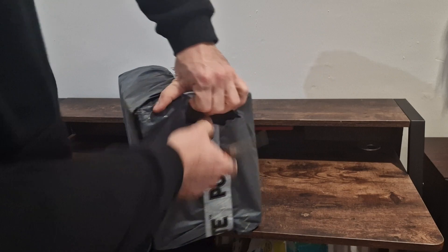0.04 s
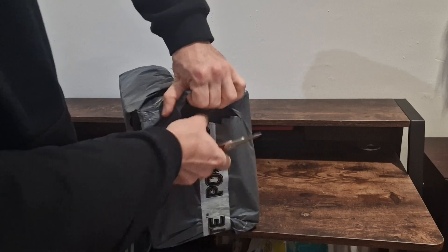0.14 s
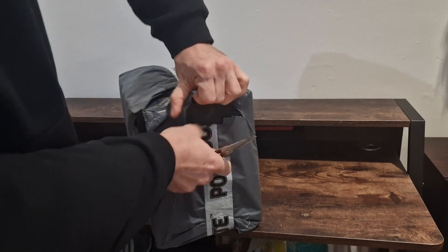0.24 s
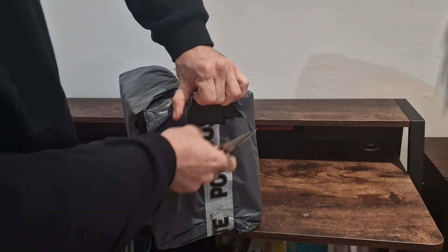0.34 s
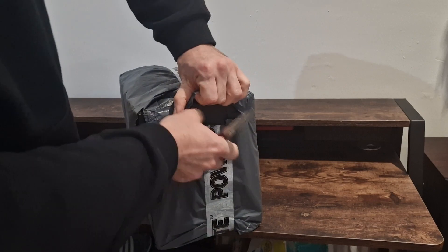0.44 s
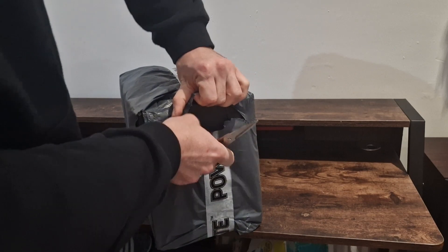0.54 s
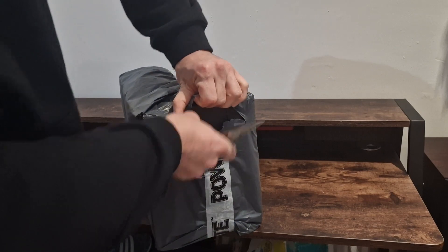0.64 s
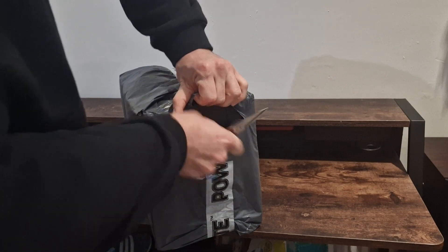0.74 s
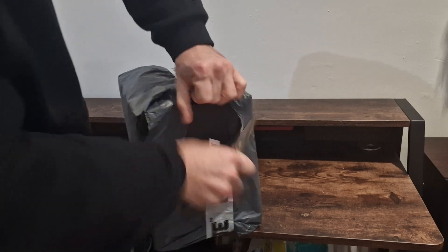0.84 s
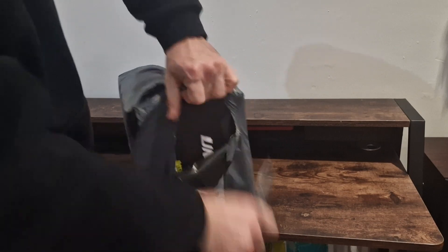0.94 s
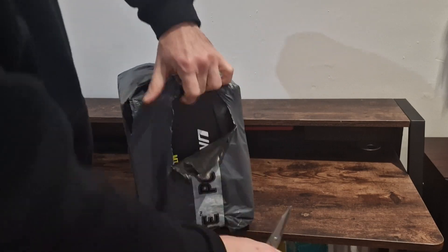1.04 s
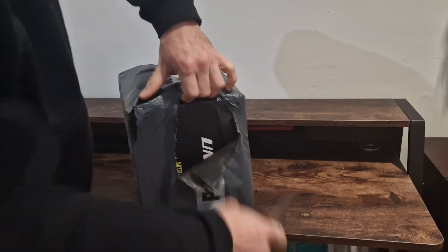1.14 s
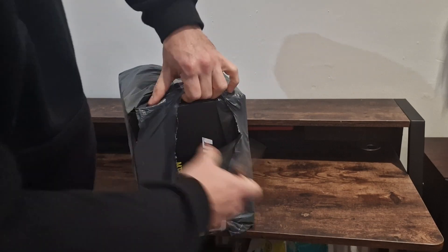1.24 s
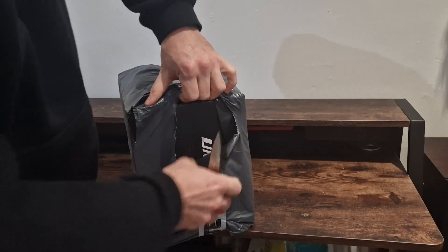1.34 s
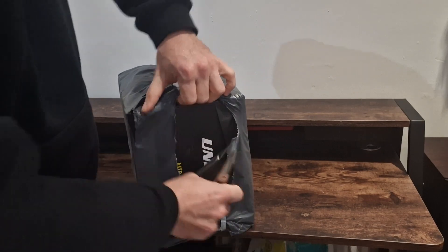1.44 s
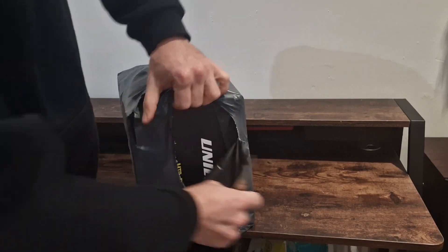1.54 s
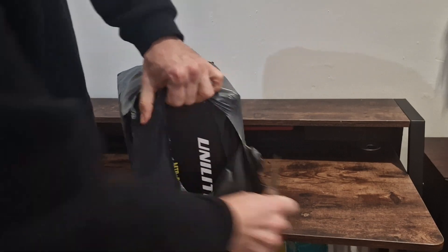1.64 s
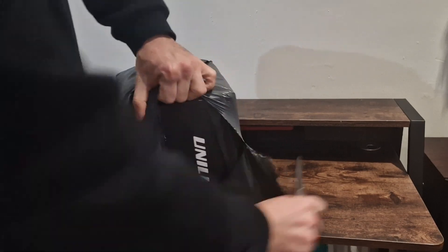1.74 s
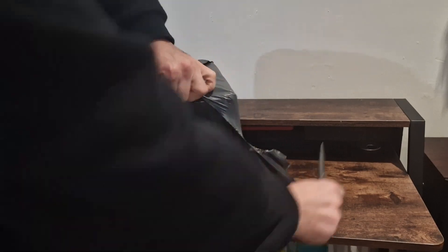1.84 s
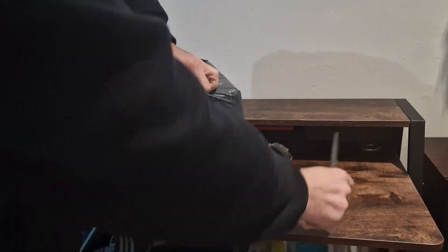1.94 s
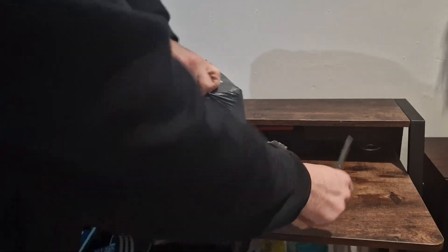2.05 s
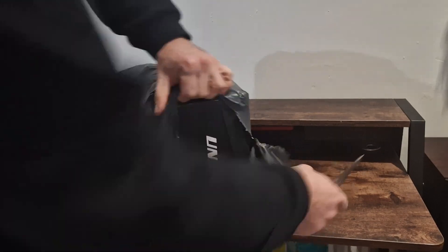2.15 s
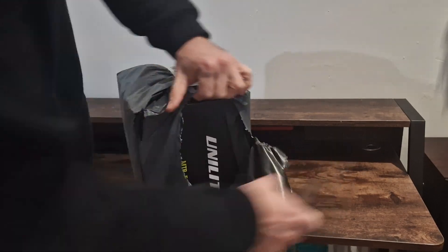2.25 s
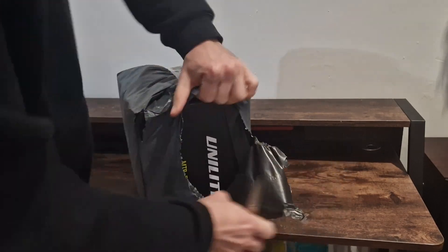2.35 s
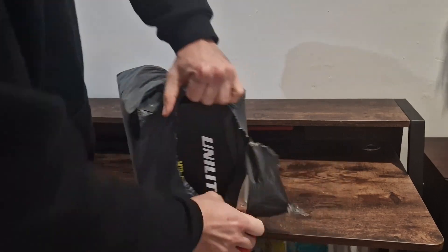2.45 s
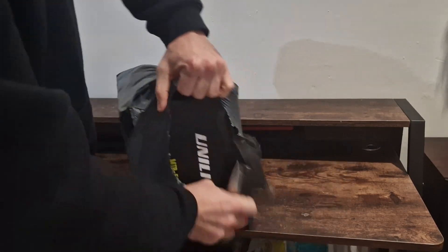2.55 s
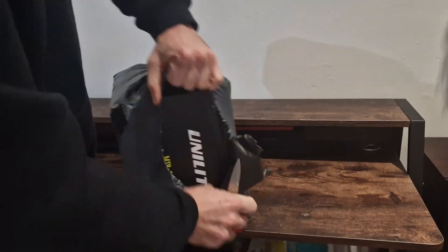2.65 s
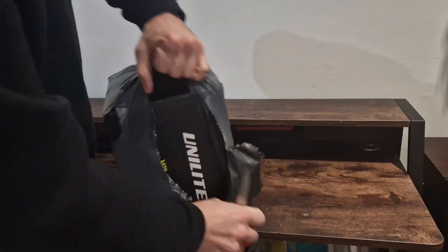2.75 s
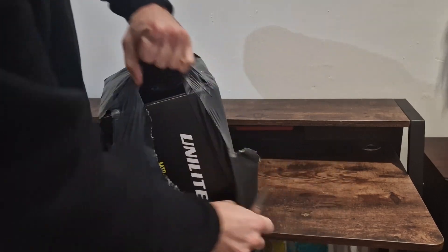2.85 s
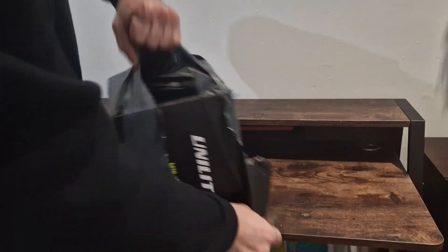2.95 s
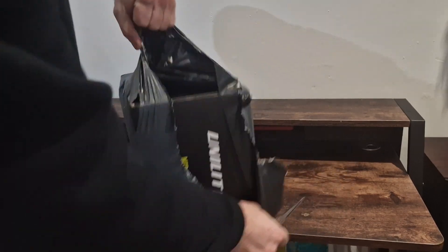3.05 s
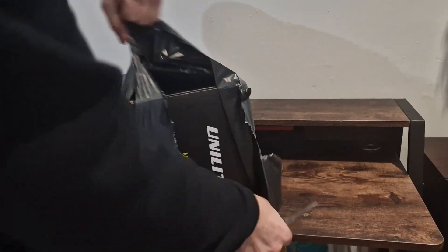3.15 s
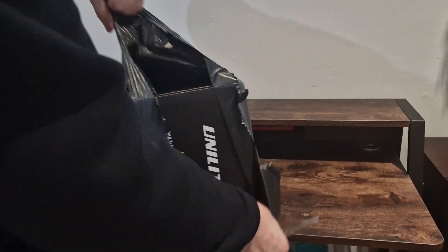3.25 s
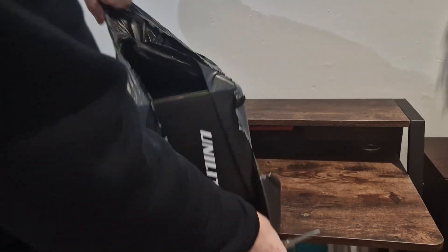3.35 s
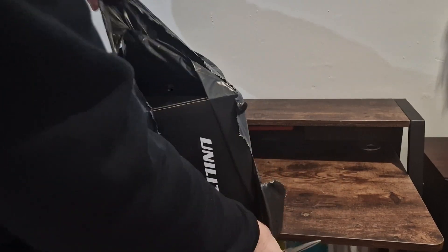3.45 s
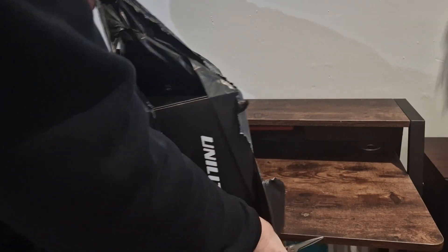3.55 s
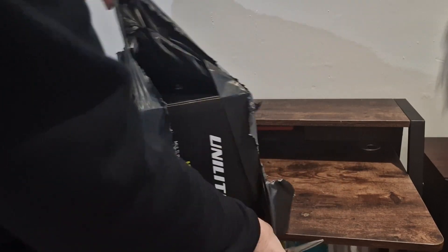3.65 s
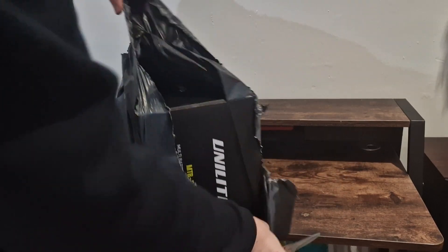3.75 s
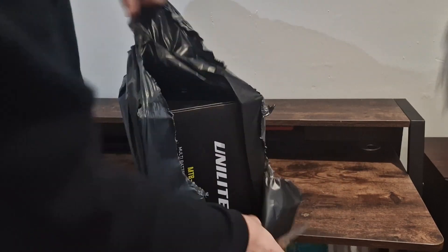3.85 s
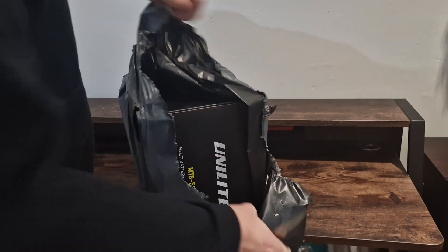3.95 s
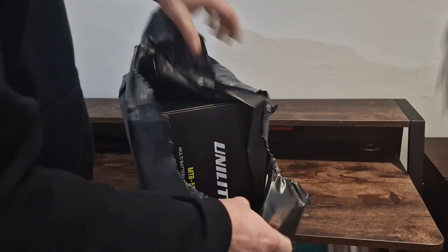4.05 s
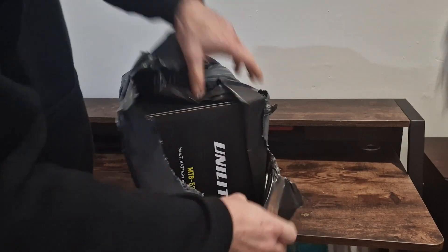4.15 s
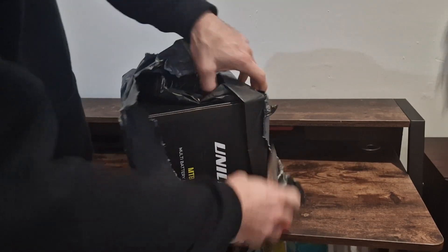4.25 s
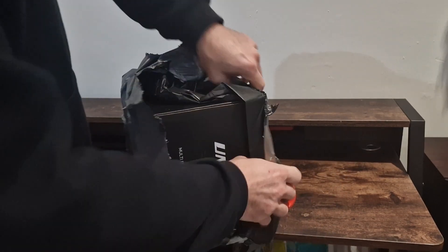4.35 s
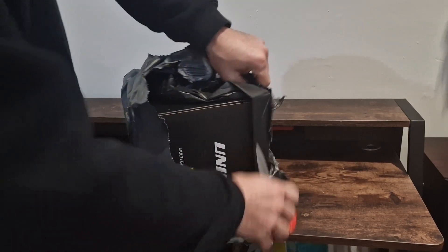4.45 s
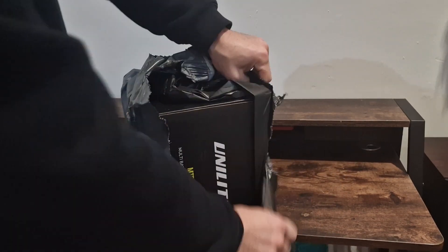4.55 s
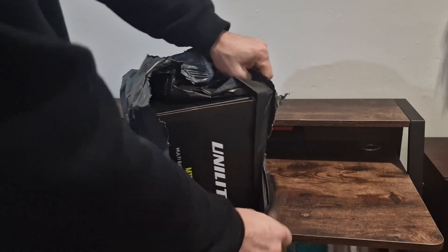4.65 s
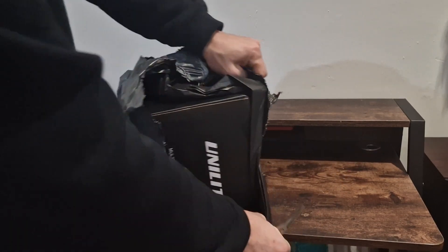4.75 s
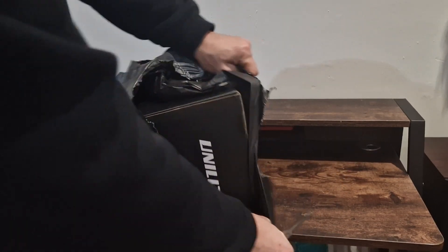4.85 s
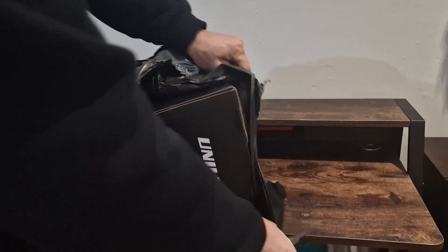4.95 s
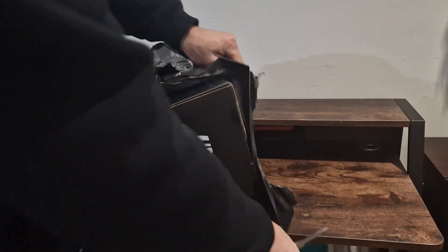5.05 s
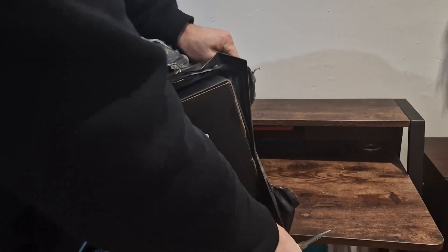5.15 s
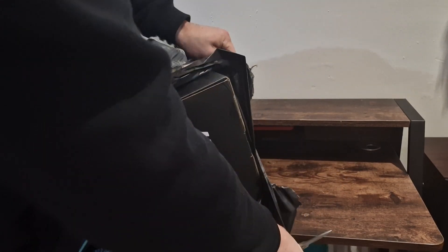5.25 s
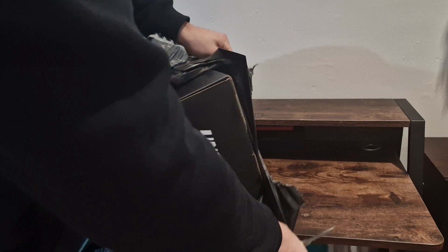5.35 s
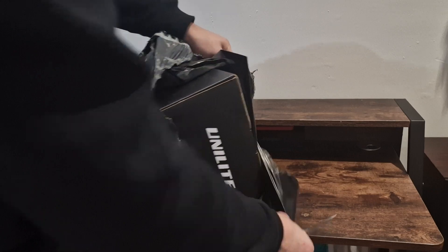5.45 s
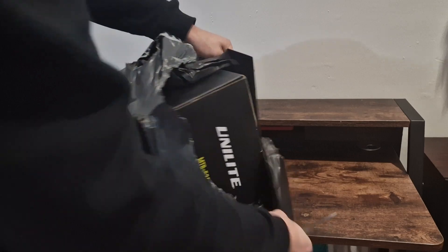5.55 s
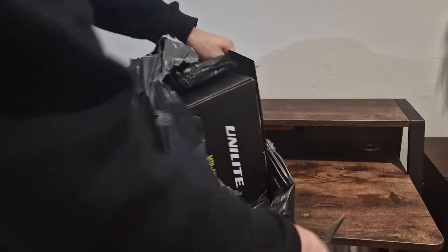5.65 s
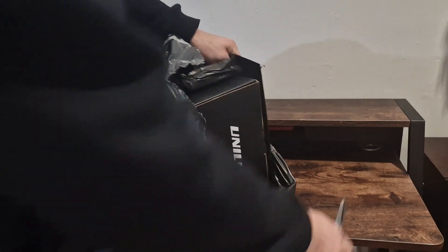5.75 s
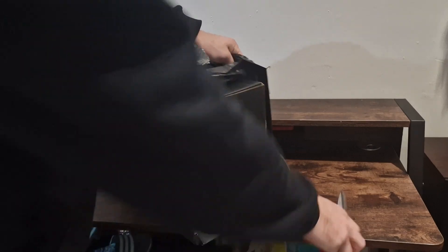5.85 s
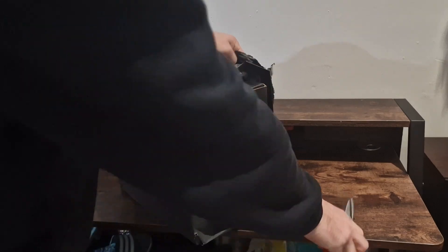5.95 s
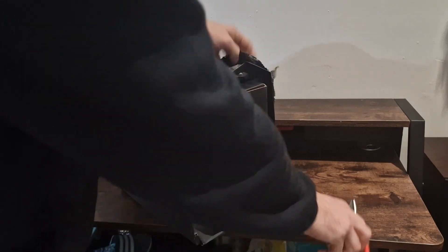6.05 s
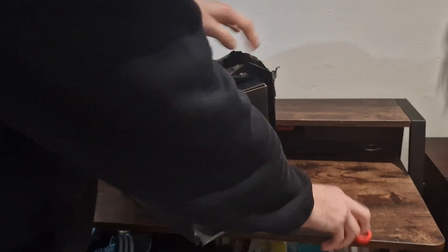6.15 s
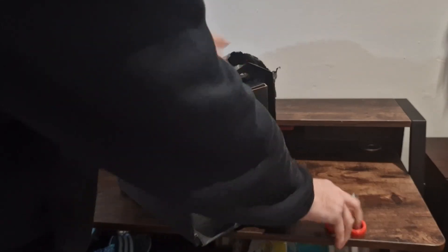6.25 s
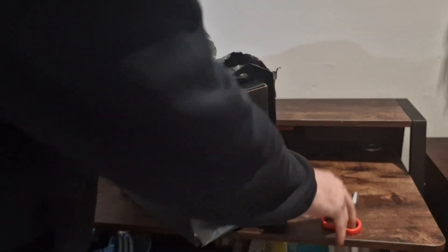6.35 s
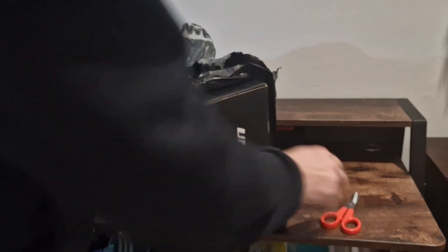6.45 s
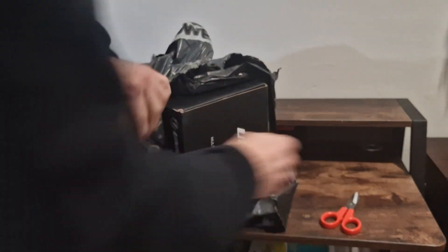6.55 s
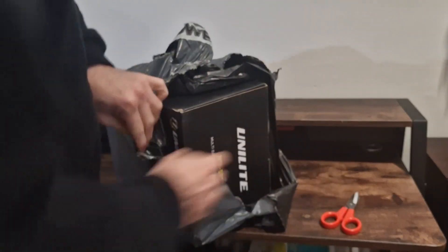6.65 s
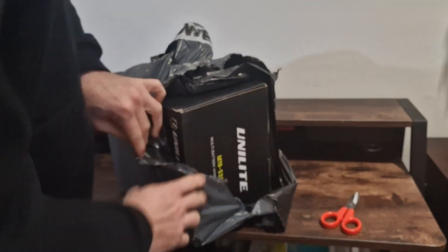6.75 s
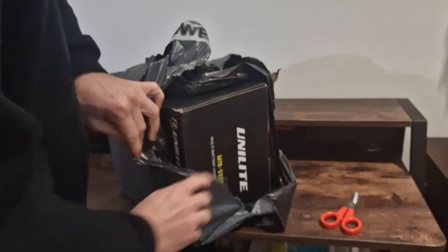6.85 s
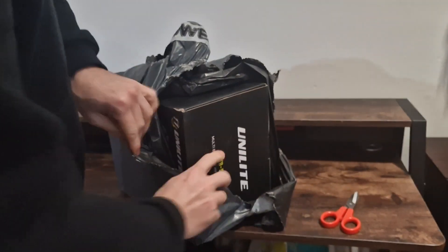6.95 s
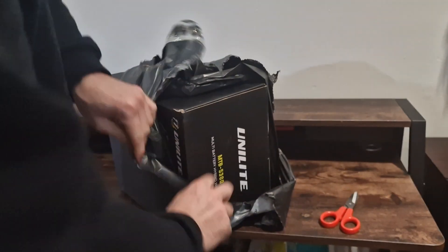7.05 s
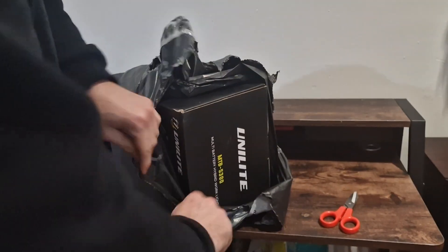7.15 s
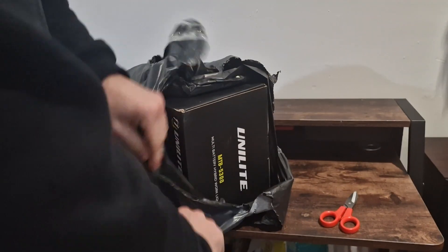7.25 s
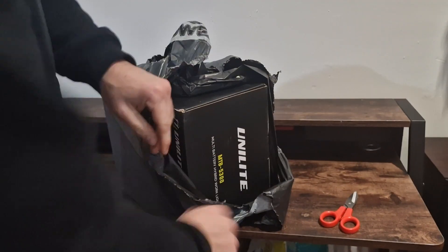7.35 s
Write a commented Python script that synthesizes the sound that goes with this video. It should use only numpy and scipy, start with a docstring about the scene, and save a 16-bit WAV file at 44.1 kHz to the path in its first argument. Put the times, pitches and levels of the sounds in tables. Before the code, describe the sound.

Hands rip a plastic bag away from a cardboard box on a desk indoors. Uneven crackling comes in grips and pauses, punctuated by dry loud snaps and hollow bumps. Sustained rustling follows, one more hard snap, then a pair of scissors lands on the wood with a bright knock and quick rattle. Light, crisp plastic rustle ends it. Near stereo microphones, short room reflections, faint hiss.

```python
"""Plastic film crackles and snaps as hands tear a mailer bag and drag it off a cardboard box on a desk.
The film is thousands of short damped clicks over a low boom; larger snaps are a click and a fizz.
Fingers and tugs knock the hollow box, made of pushes into resonances, and a finger squeaks faintly.
Scissors are tapped, then dropped rattling on the wooden desk, with ringing noise for their blades.
Two microphone ports a few centimetres apart hear it all in a small room with a quiet hush."""
import sys
import numpy as np
from scipy import signal
from scipy.fft import rfft, irfft, next_fast_len
from scipy.io import wavfile
from scipy.ndimage import map_coordinates

SR = 44100
rng = np.random.default_rng(int(sys.argv[2]) if len(sys.argv) > 2 else 0)


def natural_amplitude(level_db):
    """Convert a level in decibels to a linear amplitude factor, elementwise."""
    exponent = np.asarray(level_db, float) / 20
    return 10 ** exponent


def persist_wave(psi):
    """Save psi, clipped to +-1, as 16-bit WAV."""
    counts = np.round(np.clip(psi, -1, 1) * 32767).astype(np.int16)
    wavfile.write(sys.argv[1], SR, np.atleast_2d(counts).T)


N = 325899  # length in samples, about 7.4 s

# Resonances of the cardboard box. Each row: centre in Hz, width in Hz, strength in dB.
BOX_MODES = [(265, 74, 5), (363.4, 68, 2.5), (490, 88, -0.5), (750, 160, 0.5), (1050, 320, -2.5),
             (1383, 120, -3)]
# The deep thud: the air in the box and the desk under it. Each row: centre in Hz, width in Hz, strength in dB.
THUD_MODES = [(59, 37, -10.5), (92, 31, -0.5), (155.5, 26.3, 5)]
# Tone colour of the creasing film. Each row: frequency in Hz, relative gain in dB.
CREASE_COLOUR = [(180, 4), (300, -5.5), (406, 3), (529, -8), (755, -5), (861, -7), (1310, -2.5),
                 (1730, -0.5), (7000, -6), (9100, -2), (15400, -120)]
# Tone colour of the fine crackle. Each row: frequency in Hz, relative gain in dB.
CRACKLE_COLOUR = [(2060, 5), (3500, 9.5), (6280, 6), (6870, 6), (7480, 8), (11100, -1.5), (15200, 1.5),
                  (16200, -32), (16500, -49)]
# Where the hands work. Each row: time in seconds, samples by which the left port hears late,
# left over right level in dB.
HAND_PLACE = [(0, -3.5, 1.5), (1.2, -2.5, 2.5), (1.75, 0.5, 1.5), (2.25, -2.5, 1.7), (3.2, -3.5, 1),
              (4.2, -5, 1), (4.8, 3, 1), (5.7, 3, 0.5), (6.3, 2, 0.5), (6.7, -4, 1.3), (7.39, -4, -0.5)]


def unit(x):
    """Scale a sound to an rms of 1."""
    return x / np.sqrt(np.mean(x ** 2) + 1e-20)


def along(points, hz):
    """Read a (Hz, value) curve on a log frequency axis."""
    f, value = np.transpose(points)
    return np.interp(np.log(hz + 1), np.log(f + 1), value)


def wobble(rate):
    """A smooth random curve with the given number of knots a second."""
    knots = rng.standard_normal(int(N * rate / SR) + 4)
    return map_coordinates(knots, [np.arange(N) * rate / SR])


def filtered(x, response):
    """Filter a sound by a complex response of frequency."""
    m = next_fast_len(x.shape[-1] + 8192)  # spare room for the filter's tail
    return irfft(rfft(x, m) * response(np.fft.rfftfreq(m, 1 / SR)), m)[..., :x.shape[-1]]


def lag_at(s):
    """Samples by which the left port hears late a sound made at time s."""
    return np.interp(s, *np.transpose(HAND_PLACE)[:2])


def add(pair, s, x, scatter=0.):
    """Lay a sound into both ports, from a spot near the hands; scatter is in samples."""
    late = lag_at(s) + scatter * rng.standard_normal()
    starts = (round(s * SR + late), round(s * SR))
    for port, at in zip(pair, starts):
        port[at:at + len(x)] += x[:N - at]


def body(modes, sign=-1):
    """Response of a set of resonances; like signs leave dark valleys between them."""
    def response(f):
        total = 0
        for k, (centre, width, db) in enumerate(modes):
            damping = 1j * f * width
            total = total + sign ** k * natural_amplitude(db) * damping / (centre * centre - f * f + damping)
        return total
    return response


def ring(modes, contact_ms, scatter_db, judder=0., sign=-1):
    """One blow of peak 1: a half-sine push and juddering after-touches drive modes of varying strength."""
    t = np.arange(SR // 5) / SR
    push = np.sin(np.pi * np.clip(t * 1000 / contact_ms, 0, 1))
    touches = judder * rng.standard_normal(len(t)) * natural_amplitude(-60 * t / 0.067)
    touches[0] = 1
    force = signal.fftconvolve(push, touches)[:len(t)]
    struck = [(c, w, db + rng.normal(0, scatter_db)) for c, w, db in modes]
    x = filtered(force, body(struck, sign))
    return x / np.abs(x).max()


def judder_run(span, gap_s, peak_db, fall_db):
    """Uneven contacts that swell to a loudest moment and die away: rows of (seconds, dB)."""
    s = np.arange(span[0], span[2], gap_s)
    u = rng.random((len(s), 2)) - .5
    level_db = peak_db - fall_db * np.interp(s, span, [1, 0, 1])
    return zip(s + gap_s * u[:, 0], level_db + 4 * u[:, 1])


def pops(lo_hz, hi_hz, spectrum, clumps, cycles, spread_db, lag_spread, count):
    """Creases buckle all over the film: short damped clicks of unequal size, each from its own spot."""
    u = rng.random((count, 5))
    at = (u[:, 0] * (N - 200)).astype(int) + 20
    hz = lo_hz * (hi_hz / lo_hz) ** u[:, 1:2]
    size_db = np.minimum(-spread_db * np.log(u[:, 2]), 12) + clumps[at]
    size = np.sign(u[:, 4] - .5) * hz[:, 0] * natural_amplitude(size_db)  # random polarity
    turns = hz * np.arange(128) / SR
    soft_start = np.minimum(2 * turns, 1)  # over the first half-cycle
    click = size[:, None] * np.sin(2 * np.pi * turns) * np.exp(-turns / cycles) * soft_start
    lag = np.round(lag_at(at / SR) + lag_spread * (2 * u[:, 3] - 1)).astype(int)
    pair = []
    for delay in (lag, 0):  # left port, right port
        places = (at + delay)[:, None] + np.arange(128)
        pair.append(np.bincount(places.ravel(), click.ravel(), N)[:N])
    return unit(filtered(np.array(pair), lambda f: natural_amplitude(along(spectrum, f))))


def film():
    """Big folds and fine wrinkles buckle in shared clumps; the bag scrapes the box, which booms."""
    # How hard the hands work. Each row: time in seconds, creasing level in dB before the slacks,
    # fine crackle over creasing in dB.
    effort = [(0, -57.5, -4), (.05, -52.5, -3), (.15, -50.5, -1.5), (.29, -50.5, -2.5), (.4, -58, 7),
              (.53, -51.5, -4.5), (.66, -54.5, -2), (.76, -50.5, 2), (.85, -42, -1.5), (0.874, -33.5, 0.5),
              (.95, -37.5, -2.5), (1.0, -55.5, -5), (1.08, -52.5, -3), (1.13, -48, -1.5), (1.24, -60.5, -3),
              (1.36, -51, -3.5), (1.53, -47.5, 1), (1.67, -42, -4.5), (1.76, -41.5, -7), (1.79, -37.5, -12),
              (1.88, -57.5, -1), (2.0, -56.5, -8), (2.1, -53.5, -14), (2.22, -54.5, 4), (2.35, -54, 0),
              (2.42, -53, -10), (2.49, -37, -4.5), (2.62, -46, -2), (2.67, -42, -5.5), (2.86, -42, -5),
              (3.05, -40, -5.5), (3.2, -40, -4.5), (3.36, -39, -5), (3.39, -32.5, -7.5), (3.44, -37.5, -4),
              (3.52, -47, -5), (3.65, -50, -19), (3.72, -47, -5), (3.9, -45.5, -3.5), (4.03, -51, -6),
              (4.18, -46.5, 0.5), (4.3, -45.5, -6), (4.5, -47, 0), (4.565, -40, -10.5), (4.68, -47.5, -2),
              (4.91, -42.5, -4.5), (5.08, -43, -8.5), (5.23, -47.5, -4), (5.3, -47.5, -5),
              (5.43, -49.5, -5), (5.57, -37.5, -2), (5.64, -43.5, -5.5), (5.74, -53, -3.5),
              (5.86, -49, -12), (6.03, -49, -5.5), (6.08, -56.5, -9), (6.19, -60, -7), (6.36, -47.5, -15),
              (6.47, -54.5, 1.5), (6.63, -58.5, -0.5), (6.7, -52.5, 3.5), (6.81, -50, 1), (6.92, -48.5, -1),
              (7.01, -54.5, -5.5), (7.1, -43.5, 4.5), (7.25, -47, 5.5), (7.3, -68, 1.5), (7.39, -73.5, 0)]
    # The grip slackens, then bites again. Each row: time of the new bite in seconds,
    # length of the slack in seconds, drop in creasing level in dB.
    slacks = [(.2, 0.026, 7.5), (.368, 0.021, 8), (.49, 0.065, 7.5), (.742, 0.048, 11.5), (1.07, 0.037, 6),
              (1.348, 0.055, 12.5), (1.77, 0.0098, 7), (2.07, 0.057, 7), (2.33, 0.053, 8.5),
              (2.93, 0.043, 3.5), (3.15, 0.073, 9.5), (3.624, 0.086, 7.5), (4.1, 0.068, 3),
              (5.829, 0.058, 6), (6.0, 0.021, 8), (6.455, 0.029, 2.5), (6.685, 0.029, 3.5),
              (6.875, 0.045, 8), (7.0, 0.045, -0.5), (7.235, 0.042, 8)]
    let_go_s, bite_s = 0.023, 0.02  # fade into a slack and out of it
    t = np.arange(N) / SR
    s, *levels = np.transpose(effort)
    crease_db, fine_db = [np.interp(t, s, level) for level in levels]
    for bite, length, depth_db in slacks:
        edges = bite + np.array([-length - let_go_s, -length, 0, bite_s])
        crease_db = crease_db - depth_db * np.interp(t, edges, [0, 1, 1, 0])
    # the boom is -57.5 dB at a middling effort of -50.5 dB and grows 0.81 dB per dB of effort
    boom_db = -57.5 + 0.81 * (crease_db + 50.5)
    clumps = 1.67 * wobble(18) + 0.87 * wobble(70)  # in dB
    folds = pops(306, 7300, CREASE_COLOUR, clumps, cycles=0.8, spread_db=3.5, lag_spread=3, count=20000)
    wrinkles = pops(3640, 19600, CRACKLE_COLOUR, clumps, cycles=1.0, spread_db=2.0, lag_spread=3.5,
                    count=20000)
    scrape = rng.standard_normal(N) * natural_amplitude(0.73 * wobble(25) + clumps)
    boom = unit(filtered(scrape, lambda f: body(BOX_MODES)(f) + natural_amplitude(-1.8) * body(THUD_MODES)(f)))
    return natural_amplitude(crease_db) * (folds + natural_amplitude(fine_db) * wrinkles) + natural_amplitude(boom_db) * boom


def snaps():
    """A taut fold lets go: one broad click with a sharp tick, then a short fizz."""
    # Each row: start in seconds, level in dB, pitch of the click in Hz.
    film_snaps = [(0.0606, -26.5, 7400), (0.2418, -46, 2050), (0.278, -25, 1960), (0.37, -32, 3200),
                  (0.61, -31, 4620), (0.7436, -34, 2470), (0.7633, -34.5, 2160), (0.8207, -19, 5200),
                  (0.8647, -12, 1870), (1.078, -33, 1130), (1.143, -34, 5000), (1.2635, -31, 5500),
                  (1.3295, -31.5, 5000), (1.3767, -33, 5000), (1.426, -26.5, 5000), (1.4854, -26.5, 4000),
                  (1.5279, -26, 1940), (1.5973, -23.5, 3400), (1.665, -28, 1970), (1.7715, -15, 2070),
                  (1.7819, -5.5, 2090), (2.0893, -35, 1660), (2.1839, -32.5, 7550), (2.213, -29, 4500),
                  (2.2399, -34, 2110), (2.3326, -32.5, 7000), (2.477, -29, 3400), (2.5156, -16, 2060),
                  (2.659, -21, 3200), (2.853, -28, 1350), (2.9488, -10.5, 2600), (3.0201, -22, 1800),
                  (3.3076, -26, 1820), (3.375, -18, 1240), (3.4193, -18.5, 1760), (3.6282, -33, 1480),
                  (3.7144, -32, 1440), (4.2743, -24, 1450), (4.563, -25.5, 1250), (4.768, -28, 1330),
                  (4.8564, -29, 2030), (4.8992, -23, 1480), (5.0773, -23, 2510), (5.3948, -26, 1510),
                  (5.5719, -19.5, 4900), (5.5888, -8.5, 4370), (6.4747, -34, 1500), (6.541, -36, 7440),
                  (6.633, -31, 7680), (6.6884, -32, 1440), (6.7226, -20.5, 7600), (6.759, -30.5, 3400),
                  (7.0966, -31, 2270), (7.2446, -33, 7520)]
    fizz_t60_s = 0.024  # time to fall by 60 dB
    out = np.zeros((2, N))
    t = np.arange(SR // 8) / SR
    for s, db, hz in film_snaps:
        wave = np.sin(2 * np.pi * hz * t) + 0.35 * np.sin(2 * 2 * np.pi * hz * t)
        click = wave * np.exp(-hz * t / 1.19)
        tick = 2 * natural_amplitude(-15) * np.sin(2 * np.pi * 8000 * t) * np.exp(-t / 0.0001)
        noise = rng.standard_normal(len(t)) * natural_amplitude(-60 * t / fizz_t60_s)
        fizz = filtered(noise, lambda f: natural_amplitude(np.maximum(along(CREASE_COLOUR, f), along(CRACKLE_COLOUR, f) - 6)))
        fizz = 0.55 * fizz / np.abs(fizz).max()
        add(out, s, natural_amplitude(db) * (click + tick + fizz), scatter=1.3)
    return out


def knocks():
    """Fingers and tugs knock the box, and it judders along the desk; a slow contact is dull, a heavy one thuds."""
    # Each row: start in seconds, level in dB, contact in ms, deep thud over the knock in dB,
    # favoured tone of the struck spot in Hz.
    box_knocks = [(0.124, -32, 0.68, -13, 245), (0.134, -40, 4, 7, 300), (0.149, -38, 0.91, -3, 290),
                  (0.241, -36.5, 0.46, -5, 280), (0.274, -25.5, 0.31, -18, 500),
                  (0.297, -30.5, 0.54, -4, 495), (0.476, -37.5, 0.39, -1.5, 490),
                  (0.859, -31, 1.8, -16, 269), (0.898, -29.5, 1.6, 0, 253), (0.958, -37.5, 1.7, 4.5, 288),
                  (1.088, -36, 0.8, -4, 276), (1.137, -38.5, 0.5, 2, 249), (1.464, -42, 1.8, -8, 290),
                  (1.653, -33, 1.2, -9, 250), (1.782, -24, 1.75, -3.5, 250), (2.088, -45.5, 0.82, -27, 490),
                  (2.211, -37.5, 0.4, -30, 545), (2.487, -26, 1.8, -9, 275), (2.512, -35, 2.1, -3, 292),
                  (2.579, -36, 2.1, -0.5, 328), (2.675, -47.5, 0.7, -5, 579),
                  (2.904, -38, 0.94, -17.5, 270), (2.949, -15, 0.95, -23, 303),
                  (3.083, -22.5, 2.24, -2, 300), (3.316, -29, 0.48, -17, 367), (3.38, -25.5, 0.58, -4, 734),
                  (3.896, -33.5, 1, -9, 713), (4.199, -39, 5.1, 6, 260), (4.269, -24, 0.58, -12, 480),
                  (4.276, -24, 0.31, -22, 700), (4.338, -34.5, 0.74, -20, 450), (5.07, -35, 0.47, -23, 450),
                  (5.573, -26.5, 0.61, -20, 340), (5.594, -17.5, 0.59, -16.5, 326),
                  (6.565, -31, 0.92, -13, 272), (6.689, -32, 0.45, 0, 246), (6.706, -48, 0.51, 9, 300),
                  (6.883, -39, 0.38, -2.5, 316), (7.159, -39.5, 1.8, -0.5, 372)]
    spot_db, spot_octaves = 8.5, 0.26  # lift of the modes near the favoured tone, and its reach
    scuff_s = (4.195, 4.265, 4.37)  # start, loudest, end of the judder
    # over those three moments the weight lifts and the tone climbs
    scuff_thud_db, scuff_hz = (-3, -12, -16), (300, 478, 700)
    scuff = [(s, db, 0.64, np.interp(s, scuff_s, scuff_thud_db), np.interp(s, scuff_s, scuff_hz))
             for s, db in judder_run(scuff_s, gap_s=.01, peak_db=-31.5, fall_db=10.5)]
    out = np.zeros((2, N))
    for s, db, contact_ms, thud_db, hz in box_knocks + scuff:
        face = [(c, w, g + spot_db * np.exp(-(np.log2(c / hz) / spot_octaves) ** 2))
                for c, w, g in BOX_MODES]
        knock = ring(face, contact_ms, scatter_db=2, judder=.04)
        thud = ring(THUD_MODES, max(2.1, 2 * contact_ms), scatter_db=5.5)
        add(out, s, natural_amplitude(db) * (knock + natural_amplitude(thud_db) * thud))
    return out


def scissors():
    """Each bounce knocks the desk top and makes the loose blades chatter, until they rattle to rest."""
    # Each row: start in seconds, level in dB, blade ring over the wood in dB, contact in ms.
    strikes = [(5.965, -21.5, -17, 1.02), (5.98, -23, -33, 1.07), (6.012, -37, -10, 1),
               (6.2013, -4.5, -8.5, 0.13), (6.208, -16, -16, 0.27), (6.243, -11.5, -2.5, 0.29),
               (6.266, -13.5, 10.5, 0.1), (6.305, -18, 4, 0.81)]
    # Resonances of the desk top. Each row: centre in Hz, width in Hz, strength in dB.
    desk_modes = [(71, 15, -6), (136, 29, 0.5), (332, 54, -1.5), (462, 53, 3.5), (850, 66, -4),
                  (1117, 69, 0.5), (1440, 180, -2), (2280, 390, -1.5), (2620, 120, -4), (4030, 190, -1)]
    # Resonances of the rattling handles and blades. Each row: centre in Hz, width in Hz, strength in dB.
    blade_modes = [(880, 1500, -2.5), (1960, 1800, -2.5), (3050, 430, -3.5), (3730, 400, -3),
                   (4500, 420, -1.5), (5130, 790, -3.5), (6250, 500, 0), (7520, 350, -5.5),
                   (8400, 460, -8.5), (9900, 2600, -15), (14100, 2600, -21)]
    rattle_s = (6.238, 6.268, 6.35)  # start, loudest, end
    heavy = [(*strike, desk_modes) for strike in strikes]
    # light rattling cannot move the whole desk top, so the two deepest modes are left out
    light = [(s, db, -1.5, 0.28, desk_modes[2:])
             for s, db in judder_run(rattle_s, gap_s=.005, peak_db=-13, fall_db=16.5)]
    out = np.zeros((2, N))
    t = np.arange(SR // 5) / SR
    for s, db, blade_db, contact_ms, modes in heavy + light:
        shake = rng.standard_normal(len(t)) * natural_amplitude(-60 * t / 0.027) * (1 - np.exp(-t / 0.002))
        chatter = filtered(shake, body(blade_modes))
        chatter = chatter / np.abs(chatter).max()
        wood = ring(modes, contact_ms, scatter_db=2, judder=.07, sign=1)
        add(out, s, natural_amplitude(db) * (wood + natural_amplitude(blade_db) * chatter), scatter=2.6)
    return out


def squeak():
    """A finger slips on the film and sings faintly, by stick and slip: a blurred band of noise."""
    # Each row: time in seconds, pitch in Hz, level in dB before the random blur.
    slip = [(3.885, 740, -79), (3.9, 740, -50), (3.97, 784, -55), (4.03, 736, -53), (4.09, 697, -57),
            (4.13, 700, -73)]
    s, hz, db = np.transpose(slip)
    t = np.arange(N) / SR
    phase = 2 * np.pi * np.cumsum(np.interp(t, s, hz)) / SR
    blur = wobble(170) * np.sin(phase) + wobble(170) * np.cos(phase)
    return natural_amplitude(np.interp(t, s, db, -120, -120)) * blur


def room(pair):
    """Walls answer with a tail dying by frequency; as the hands move, the paths keep changing."""
    # Each row: frequency in Hz, time for the tail to fall by 60 dB in seconds.
    tail_t60 = [(100, 0.33), (500, 0.17), (2000, 0.18), (6000, 0.13), (14000, 0.18)]
    # Gain of the room sound. Each row: frequency in Hz, gain in dB.
    wet_gain = [(100, -13), (500, -0.5), (2000, -2), (10000, -2.5)]
    out = np.zeros((2, N + SR))
    step = SR // 12  # a new random tail every twelfth of a second
    for a in range(0, N, step):
        hz, t, z = signal.stft(rng.standard_normal((2, SR // 3)), SR, nperseg=256)
        decay = natural_amplitude(-60 * t / along(tail_t60, hz)[:, None])
        tail = signal.istft(z * decay, SR, nperseg=256)[1]
        wet = signal.fftconvolve(pair[:, a:a + step], tail / np.linalg.norm(tail[0]), axes=1)
        out[:, a + 60:a + 60 + wet.shape[1]] += wet  # the walls answer 60 samples late
    left, right = out[:, :N]
    mid, side = (left + right) / 2, (left - right) / 2
    side = filtered(side, lambda f: f / (f + 150))  # long waves reach both ports alike
    return filtered(np.array([mid + side, mid - side]), lambda f: natural_amplitude(along(wet_gain, f)))


def hush():
    """The room's quiet air and the microphone's own hiss: steady coloured noise at -71 dB rms."""
    # Each row: frequency in Hz, relative gain in dB.
    hush_colour = [(18, -53), (30, 4), (142, 8.5), (217, -9), (276, -13), (562, -22), (7470, 1),
                   (15200, -38), (16500, -41)]
    noise = rng.standard_normal((2, N))
    return natural_amplitude(-71) * unit(filtered(noise, lambda f: natural_amplitude(along(hush_colour, f))))


def scene():
    """All sources, heard directly and through the room, over the hush."""
    near = film() + snaps() + knocks() + scissors() + squeak()
    pan_db = np.interp(np.arange(N) / SR, *np.transpose(HAND_PLACE)[::2])
    direct = near * natural_amplitude([pan_db / 2, -pan_db / 2])
    return direct + room(near) + hush()


def roll_off(x):
    """The treble ends steeply here."""
    return signal.sosfilt(signal.butter(12, 17000, fs=SR, output="sos"), x)


def record(dry):
    """The microphone rolls off the deep bass, around 45 Hz."""
    heard = filtered(dry, lambda f: (1j * f / (45 + 1j * f)) ** 2)
    return roll_off(heard)


dry = scene()
out = record(dry)
persist_wave(out)
```